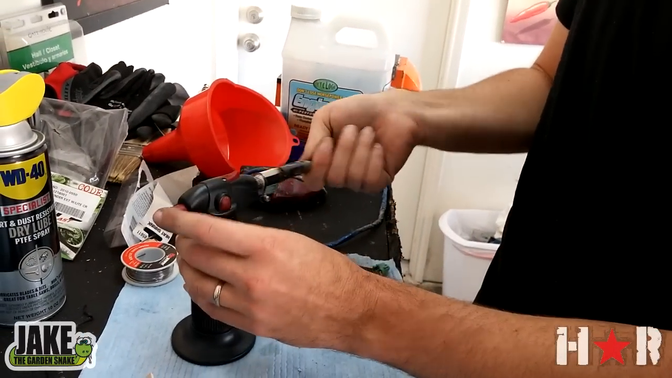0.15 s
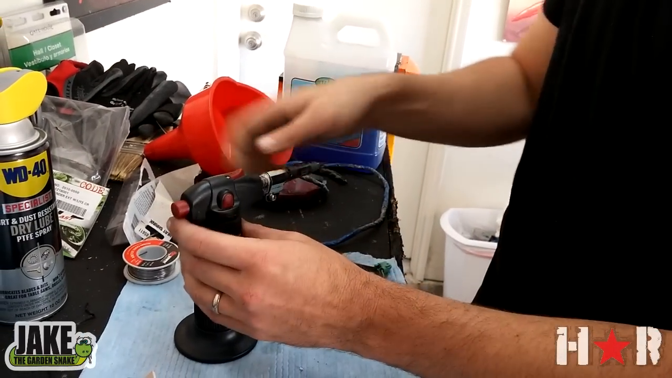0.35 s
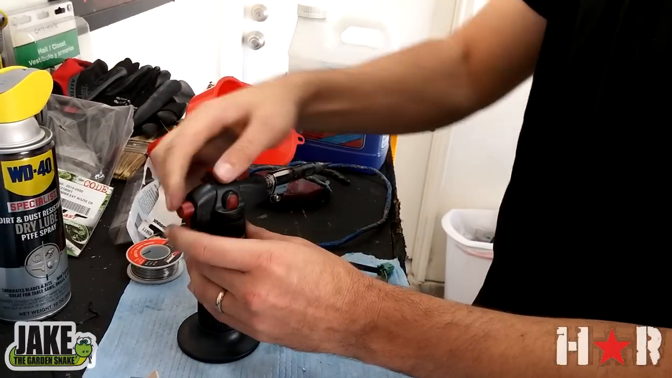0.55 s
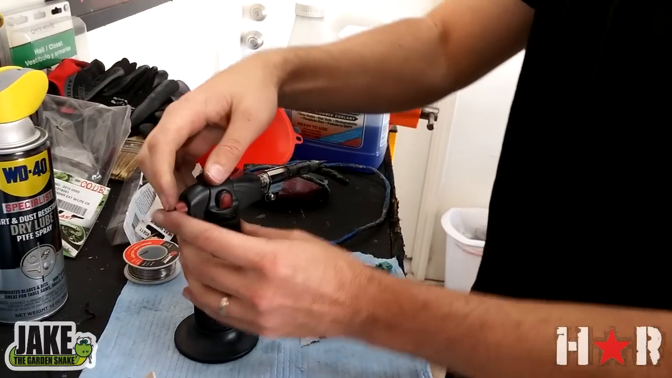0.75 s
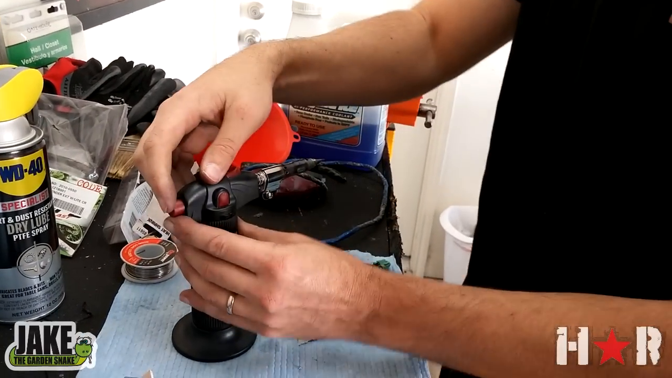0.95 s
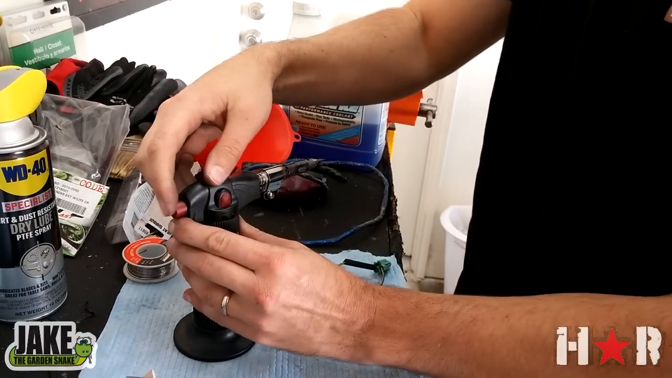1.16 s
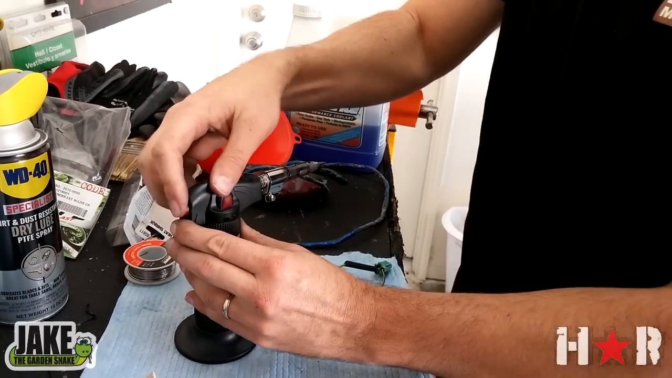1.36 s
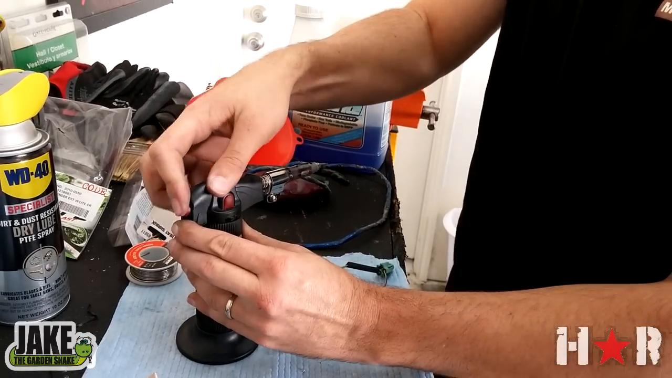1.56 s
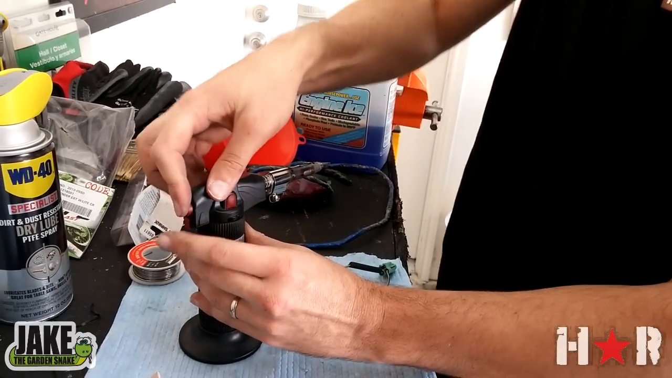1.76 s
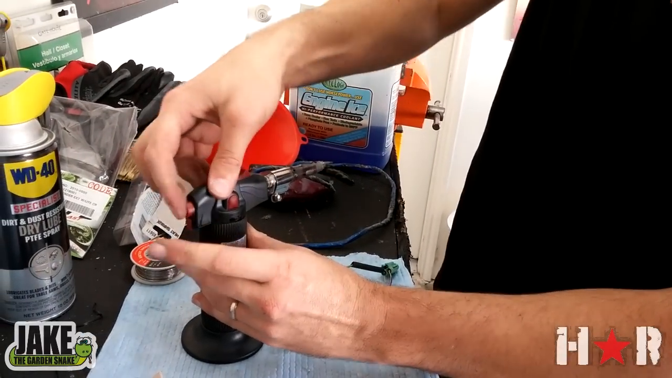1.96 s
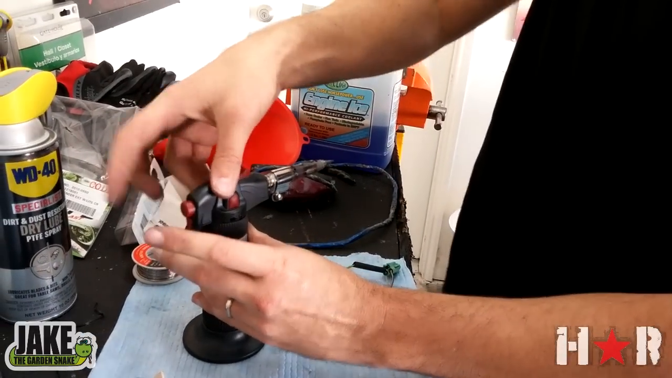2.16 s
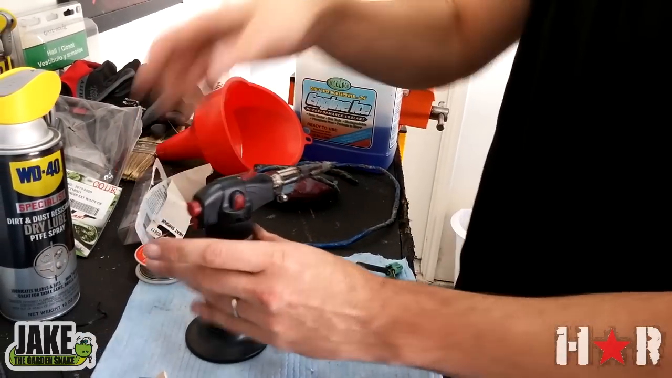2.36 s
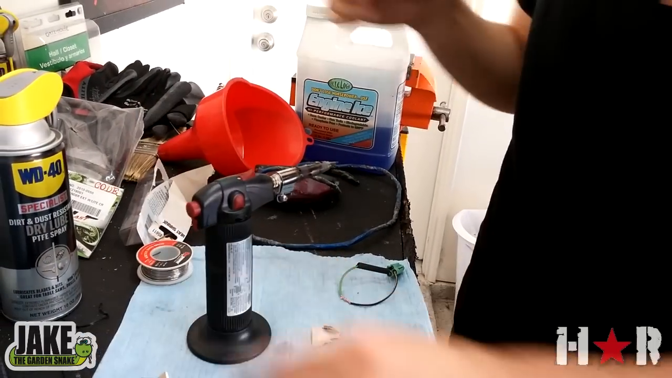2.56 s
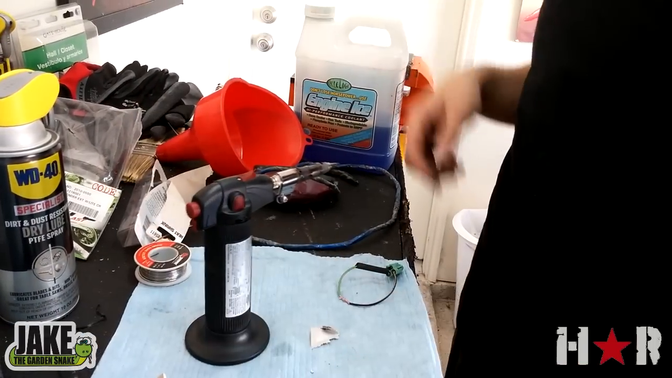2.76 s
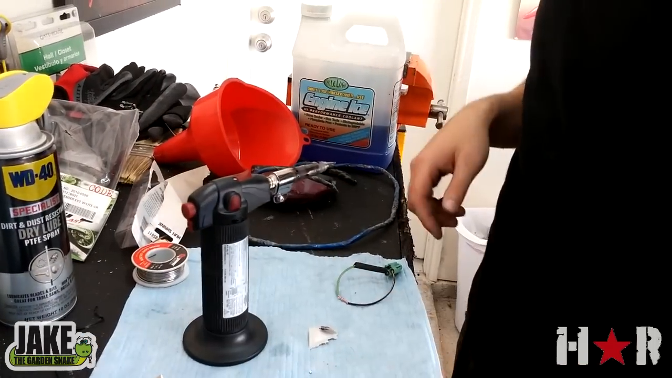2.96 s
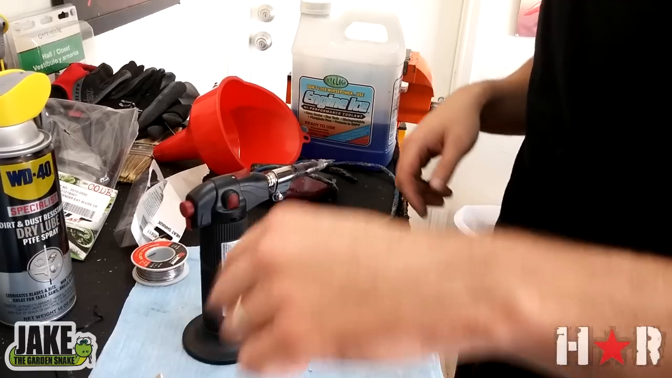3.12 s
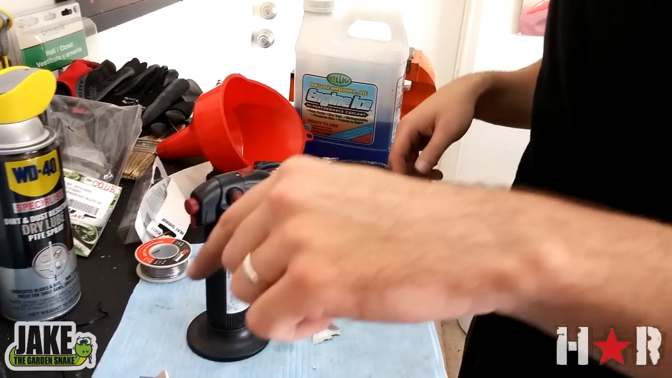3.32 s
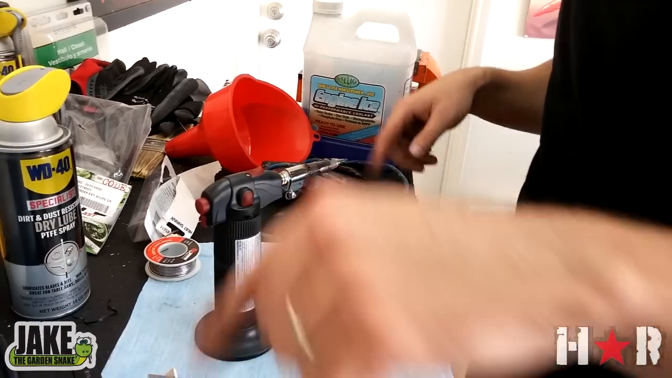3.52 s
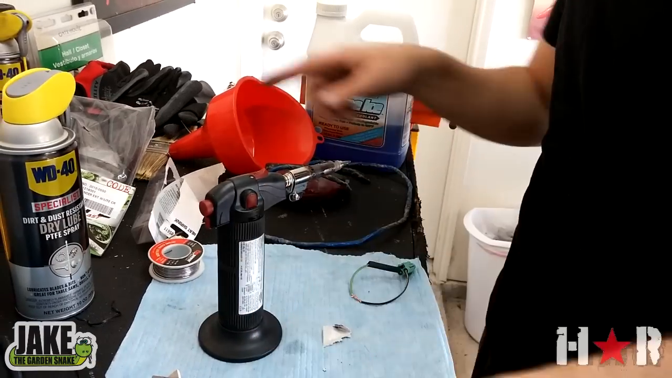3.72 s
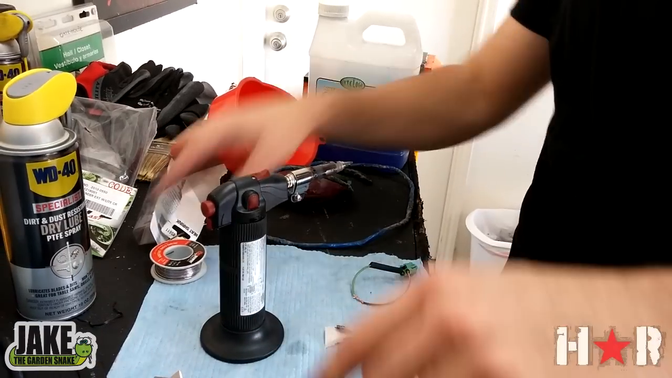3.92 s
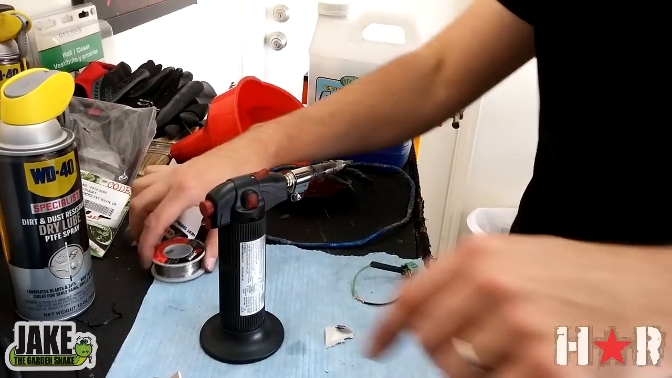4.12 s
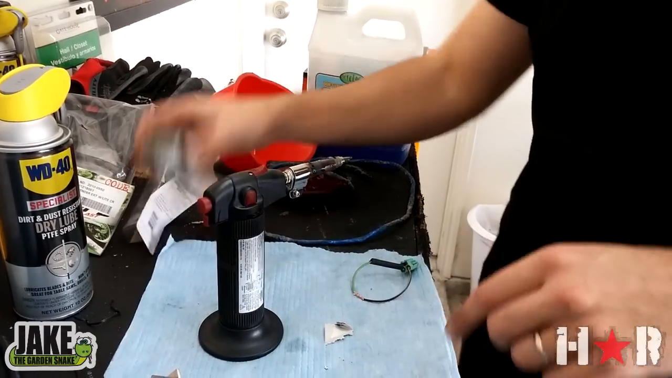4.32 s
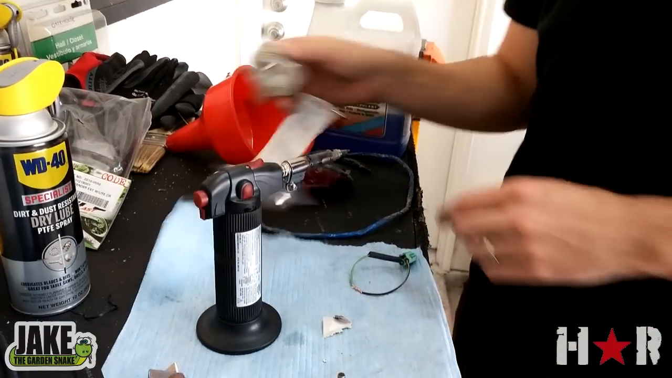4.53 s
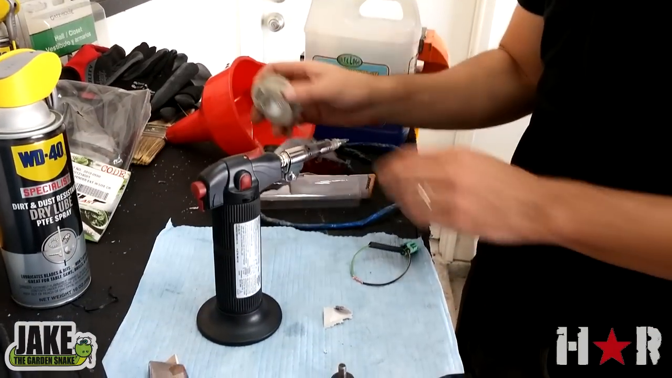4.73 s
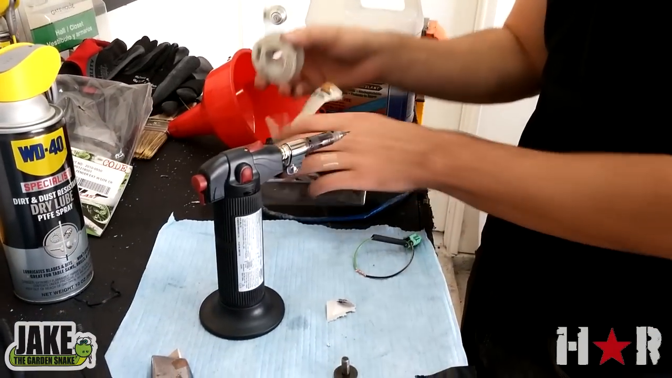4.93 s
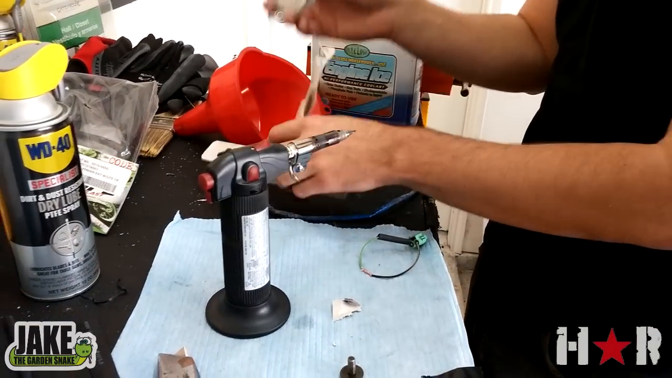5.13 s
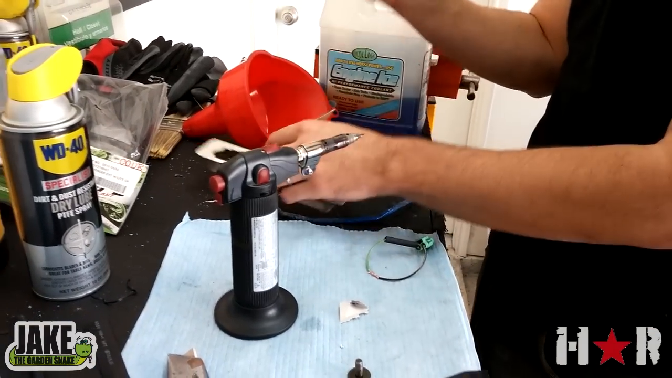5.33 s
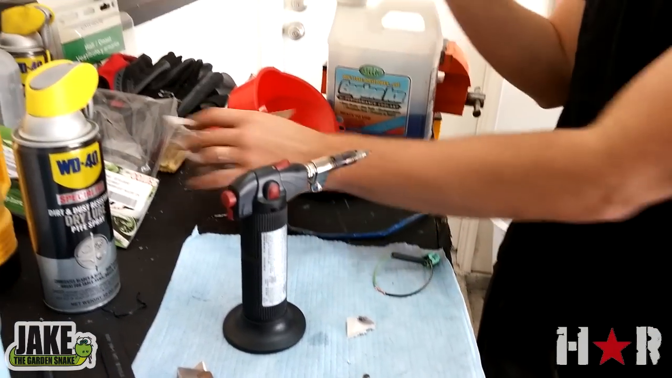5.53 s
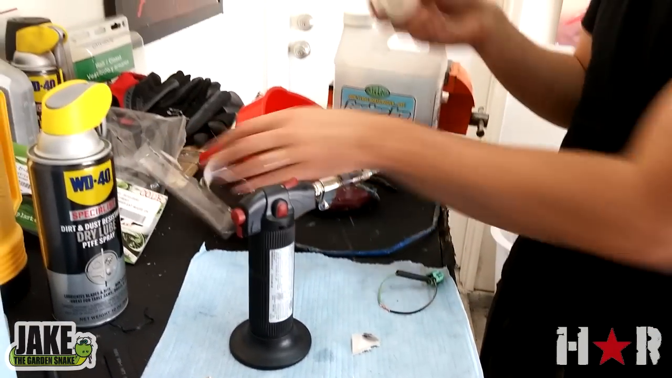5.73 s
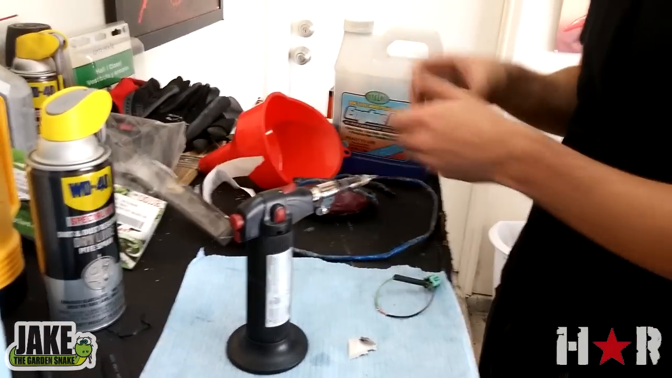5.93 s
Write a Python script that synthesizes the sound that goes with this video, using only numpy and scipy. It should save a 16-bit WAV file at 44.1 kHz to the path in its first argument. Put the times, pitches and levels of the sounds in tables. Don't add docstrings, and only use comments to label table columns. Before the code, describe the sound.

Close at a workbench in a small room, faint plastic clicks and finger rubs come over low hum. Gas briefly whistles, an igniter cracks loudly, and a flame catches with a dull thump. A strong, bright, fluttering hiss then holds to the end. Later a plastic spool is lifted off its box with light knocks, the box drops with a hard clack, rattles, and is pushed about.

```python
import sys
import numpy as np
from scipy import signal
from scipy.fft import rfft, irfft, next_fast_len
from scipy.io import wavfile
from scipy.ndimage import uniform_filter1d

SR = 44100
rng = np.random.default_rng(int(sys.argv[2]) if len(sys.argv) > 2 else 0)


def gain_from_db(level_db):
    decades = np.asarray(level_db, float) / 20
    return 10 ** decades


def wav_record(signal):
    frames = np.transpose(np.atleast_2d(signal))
    bounded = np.clip(frames, -1, 1)
    quanta = np.round(bounded * 32767).astype(np.int16)
    wavfile.write(sys.argv[1], SR, quanta)


N = 268172


def shaped(x, hz, db):
    n = next_fast_len(x.shape[-1], True)
    f = np.fft.rfftfreq(n, 1 / SR)
    gain = gain_from_db(np.interp(np.log(f + 1), np.log(hz), db))
    return irfft(rfft(x, n) * gain, n)[..., :x.shape[-1]]


def unit(x):
    return x / np.sqrt(np.mean(x ** 2))


def curve(s, v):
    return np.interp(np.arange(N) / SR, s, v)


def walk(rate):
    k = int(SR / rate)
    steps = np.repeat(rng.standard_normal(N // k + 1), k)
    return 1.75 * uniform_filter1d(uniform_filter1d(steps, k), k)[:N]


def swell(rows, rise_db_s, fall_db_s):
    t = np.arange(N) / SR
    power = 0
    for s, db, hold in rows:
        rise = rise_db_s * np.maximum(s - t, 0)
        fall = fall_db_s * np.maximum(t - s - hold, 0)
        power = power + gain_from_db(2 * (db - rise - fall))
    return np.sqrt(power)


def echoes(t60, wet_db, start, top_hz):
    t = np.arange(SR // 2) / SR
    mid, side = rng.standard_normal((2, len(t))) * (t > start) * gain_from_db(-60 * t / t60)
    side = signal.sosfilt(signal.butter(3, 800, "high", fs=SR, output="sos"), side)
    dull = signal.butter(1, top_hz, fs=SR, output="sos")
    tail = signal.sosfilt(dull, np.array([mid + side, mid - side]))
    return tail / np.sqrt(np.mean(np.sum(tail ** 2, axis=1))) * gain_from_db(wet_db)


def reflect(x, near_db, far_db):
    near = echoes(t60=0.047, wet_db=near_db, start=0.0018, top_hz=11550)
    far = echoes(t60=0.34, wet_db=far_db, start=0.00795, top_hz=9000)
    return signal.fftconvolve(x.mean(axis=0)[None], near + far, axes=1)[:, :N]


def ring(modes, push):
    t = np.arange(SR // 5) / SR
    body = 0
    for hz, db, t60 in modes:
        body = body + gain_from_db(db - 60 * t / max(t60, .002)) * np.sin(2 * np.pi * hz * t)
    y = signal.fftconvolve(body, push)[:len(t)]
    return y / np.abs(y).max()


def crack(colour, noise, decay_s, hz, bump_db):
    t = np.arange(len(noise)) / SR
    f = np.fft.rfftfreq(2 * len(t), 1 / SR)
    z = rfft(np.r_[0 * t[:88], noise * np.exp(-t / decay_s), 0 * t[88:]])
    even = np.sqrt(uniform_filter1d(np.abs(z) ** 2, size=len(t) // 40))
    bump = gain_from_db(bump_db * np.exp(-(np.log((f + 1) / hz) / 0.12) ** 2))
    burst = irfft(z / even * bump)
    y = shaped(burst, *np.transpose(colour))[66:len(t)]
    return y / np.abs(y).max()


def place(out, s, sound, db, pan_db, lag=2):
    for ch, i in enumerate((int(s * SR) + lag, int(s * SR))):
        out[ch, i:i + len(sound)] += (sound * gain_from_db(db + pan_db * (.5 - ch)))[:N - i]


def blows(table, pan_db, modes, body_db, push_s, t60, colour, crack_db, crack_s, top, top_db, top_s):
    out, t = np.zeros((2, N)), np.arange(SR // 20) / SR
    chance = rng.standard_normal((len(table), 3, len(t)))
    soft = signal.butter(2, (250, 2600), "band", fs=SR, output="sos")
    for (s, db, hz, bass_db, treble_db), (force, hiss, noise) in zip(table, chance):
        push = signal.sosfilt(soft, force * np.exp(-t / push_s))
        body = [(f * (1 + 0.035 * z), g + body_db, d) for (f, g, d), z in zip(modes, hiss)]
        low = [(370, bass_db + 11.5, 1.18 * t60), (240, bass_db + 10, 0.82 * t60), (540, bass_db + 7.5, t60)]
        place(out, s, ring([(hz, 0, t60)] + low + body, push), db, pan_db)
        place(out, s, crack(colour, noise, crack_s, hz, 7.6), db + crack_db, pan_db)
        place(out, s, crack(top, hiss, top_s, hz, 0), db + treble_db + top_db, 0, lag=1)
    return out


# (time [s], level [dB])
RECORDER_GAIN = [(0, -21.5), (.35, -20), (.55, -24), (.8, -19), (1.05, -17), (1.25, -8), (1.4, 7),
                 (1.6, -3), (6.08, -3.5)]
# (frequency [Hz], level [dB per Hz])
ROOM_COLOUR = [(18, -32), (35, -16), (60, -4.5), (78, -2), (100, -18), (140, -9.5), (250, -11.5),
               (360, -11.5), (650, -18.5), (2000, -27), (7000, -35.5), (9000, -31.5), (12000, -40),
               (15500, -36)]
# (frequency [Hz], level [dB])
FRIDGE_HUM = [(59.6, -60), (119.9, -50.5)]


def room():
    mid, side = shaped(rng.standard_normal((2, N)), *np.transpose(ROOM_COLOUR))
    side = shaped(side, [200, 900], [-20, 0])
    air = unit(mid + side * np.array([[1.1], [-.9]])) * gain_from_db(-48.5 + 1.2 * walk(3.235))
    t = np.arange(N) / SR
    hum = 0
    for hz, db in FRIDGE_HUM:
        hum = hum + np.sqrt(2) * gain_from_db(db + 1.2 * walk(6)) * np.sin(2 * np.pi * hz * t)
    hum = hum * gain_from_db(np.array([[1.2], [-1.2]]))
    low = shaped(air, [110, 170], [0, -40])
    gain_db = curve(*np.transpose(RECORDER_GAIN))
    bass_share = 0.8
    return (air - low) * gain_from_db(gain_db) + (low + hum) * gain_from_db(bass_share * gain_db)


# (time [s], peak level [dB], ring [Hz], bass [dB], treble [dB])
CATCH_TICKS = [
    (0.0199, -58.5, 2000, -22, 5.5),
    (0.2513, -66, 2020, -27, 8),
    (0.8738, -45, 1540, -13.5, 7),
    (1.066, -48, 2340, -41, -6),
    (1.085, -60, 576, -27, -30),
    (1.172, -62, 3000, -39, -19),
    (1.463, -30, 2510, -33, 0),
]
# (frequency [Hz], level [dB])
TICK_CRACK = [(800, -11.5), (1300, -2), (2500, -1), (3200, -21), (9000, -31)]
# (frequency [Hz], level [dB])
TICK_EDGE = [(2900, -23), (3600, -5), (4400, 4), (6200, -5), (8000, -13), (14000, -15)]


def catch_ticks():
    return blows(CATCH_TICKS, pan_db=5, modes=BOX_MODES[1:], body_db=-13.5, push_s=0.0022, t60=0.029,
                 colour=TICK_CRACK, crack_db=2.1, crack_s=0.0085, top=TICK_EDGE, top_db=2.2, top_s=0.0051)


# (time [s], hiss level [dB], cupping towards the upper note [dB], turn left minus right [dB])
HAND_MOVES = [(1.42, -1.5, 3.5, 2), (2.02, 0, 5, 0.5), (2.3, 0, 1, 0.5), (2.55, .5, -0.5, 2),
              (2.72, 1, 1, 0), (2.87, -2.5, 1, 3), (3.05, -1, -1.5, 2), (3.45, -1, 0.5, 0.5),
              (3.62, 1, 1, -3.5), (3.88, 0, 0, 2), (4.25, 0.5, 0, -0.5), (4.6, 0.5, 0, -1),
              (4.85, 1, 0.5, 2.5), (5.25, 0, 0, -1.5), (5.55, 1.5, -0.5, 0), (5.8, 0.5, -2, 0.5),
              (6.08, 0, 0.5, -2)]


def hands():
    s, *columns = np.transpose(HAND_MOVES)
    return [curve(s, column) for column in columns]


# (frequency [Hz], left level [dB per Hz], right level [dB per Hz])
JET_COLOUR = [(423, 3, -31), (700, -68, -54), (854, 7, 6.5), (1120, -4, -30.5), (1486, -11.5, 1.5),
              (2000, 2.5, -16.5), (2500, 3.5, -3), (3100, 1.5, 0), (3490, -5.5, -9), (3840, -12.5, -6),
              (4584, 3, 1), (4790, -2, -2.5), (5930, -3.5, -8.5), (6660, -12, -5), (7610, -17.5, -26),
              (7920, -29, -31.5)]
PART_EDGES = (1583, 2280, 3740, 5160)
# (burning [dB], unlit [dB], share of cupping, share of turn, opening [dB per s])
JET_PARTS = [
    (-59, -80, 0.38, 0, 400),
    (-45.5, -70, -0.045, 0.64, 600),
    (-41, -72, -0.75, 0.11, 600),
    (-39, -54, 0.63, 1, 1500),
    (-42.5, -60, .3, .4, 500),
]
# (time [s], level [dB], length [s])
FINGER_SLIDES = [
    (.02, -76, 0),
    (.26, -72.5, 0.046),
    (.4, -82, 0.11),
]
FINGER_COLOUR = (-17, 0, -6, -1.5, -6)
# (frequency [Hz], level [dB])
COLD_GAS_COLOUR = [(2900, 0), (3300, -14), (3800, 3), (4300, 5), (5000, -7), (5800, 3), (6400, -3),
                   (7000, -20)]
CATCH_S = 1.36


def jet():
    gas = rng.standard_normal(N) * gain_from_db(0.94 * walk(300))
    heard = np.array([np.roll(gas, 2), gas])
    for _ in range(3):
        path = echoes(t60=.2, wet_db=-8, start=.002, top_hz=9000)
        heard = heard + signal.fftconvolve(gas[None], path, axes=1)[:, :N] * gain_from_db(5.1 * walk(1.228))
    hz, left, right = np.transpose(JET_COLOUR)
    heard = np.array([shaped(heard[0], hz, left), shaped(heard[1], hz, right)])

    n = next_fast_len(N, True)
    spectrum, f = rfft(heard, n), np.fft.rfftfreq(n, 1 / SR)
    below = [1 / (1 + np.exp(np.minimum((f - edge) / 150, 50))) for edge in PART_EDGES]
    below = [0 * f] + below + [0 * f + 1]
    level_db, cup_db, turn_db = hands()
    lit = swell([(CATCH_S, 0, N / SR)], 219, 0) * (np.arange(N) > IGNITER_SNAPS[0][0] * SR)
    slides = swell(FINGER_SLIDES, 900, 70)
    burning, cold = 0, 0
    for k, (lit_db, unlit_db, cup, turn, open_db_s) in enumerate(JET_PARTS):
        band = irfft(spectrum * (below[k + 1] - below[k]), n)[:, :N]
        band = band / np.sqrt(uniform_filter1d(np.mean(band ** 2, axis=0), size=SR // 4))
        gain = lit * gain_from_db(lit_db + level_db + cup * cup_db) + slides * gain_from_db(FINGER_COLOUR[k])
        cold = cold + band * swell([(1.158, unlit_db, .11)], open_db_s, 300)
        burning = burning + band * gain * gain_from_db(1.16 * walk(9) + turn * np.array([turn_db, -turn_db]) / 2)
    return burning + shaped(cold, *np.transpose(COLD_GAS_COLOUR))


# (time [s], level [dB], length [s])
HANDLING = [
    (.25, -91, .35),
    (1.17, -67, 0.055),
    (3.85, -46, .15),
    (4.25, -40.5, 0.038),
    (4.42, -34.5, 0.013),
    (4.5, -54, 0.14),
    (4.62, -46.5, 0.14),
    (4.82, -43, 0.051),
    (5.43, -45, 0.13),
]


def rustle():
    grains = rng.standard_normal((2, N)) * gain_from_db(2.8 * walk(150) * (np.arange(N) > 1.3 * SR))
    grains[1] = .7 * grains[0] + .7 * shaped(grains[1], [300, 900], [-18, 0])
    colour = shaped(grains, [150, 350, 900, 1700, 2600, 5000, 12000], [-40, 2, -4.0, -6.5, -4, -12, -30])
    return unit(colour) * swell(HANDLING, 200, 73) * gain_from_db(2.0 + np.array([[1.5], [-1.5]]))


# (time [s], level [dB])
IGNITER_SNAPS = [
    (1.2676, -2.5),
    (1.2690, 0),
    (1.2717, 3),
    (1.2776, -26),
    (1.282, -29.5),
]
# (frequency [Hz], level [dB])
SNAP_CRACK = [(500, -19), (1800, -11.5), (2900, -3), (4500, -7.5), (6000, -7), (7200, -17), (8800, -6.5),
              (10200, -9.5), (12000, -9), (13700, -10.5), (15500, -8)]


def ignition():
    out = np.zeros((2, N))
    for (s, db), noise in zip(IGNITER_SNAPS, rng.standard_normal((len(IGNITER_SNAPS), 1024))):
        place(out, s - .0005, crack(SNAP_CRACK, noise, 0.00197, 3000, 0.36), db, .3, lag=1)
    return out


# (time [s], level [dB], modes as (frequency [Hz], level [dB], t60 [s]))
LOW_THUMPS = [
    (1.2728, -5.5, [(65, -44, 0.087), (176, 11.5, 0.077), (249, -3.5, 0.29), (313, 9, 0.069)]),
    (3.832, -28.5, [(59.6, -10, 0.21), (105, -3, 0.13), (184, -10, .1)]),
    (3.4, -39.5, [(237, 1, 0.32), (300, -12, .1)]),
    (4.417, -26.5, [(199, -2, .12), (403, 1, .1)]),
]


def thumps():
    out = np.zeros((2, N))
    for s, db, modes in LOW_THUMPS:
        place(out, s, -ring(modes, np.hanning(40)), db, .8)
    return out


def roar():
    noise = rng.standard_normal((2, N))
    mid, side = shaped(noise, [110, 157, 248, 339, 560, 710], [-15, -26, -7.5, 6.0, -7.5, -26.5])
    burst = swell([(1.3, -39, 0)], 2000, 180)
    steady = swell([(CATCH_S, -54, N / SR)], 590, 0) * gain_from_db(0.2 * hands()[0])
    return unit(mid + 0.05 * side * np.array([[1], [-1]])) * (burst + steady) * gain_from_db(2.5 * walk(11))


# (time [s], peak level [dB], ring [Hz], bass [dB])
SPOOL_LIFT = [(3.837, -24.5, 2530, -36), (3.851, -25.5, 1580, -14), (3.875, -28, 1080, -16),
              (3.9, -30, 910, -18), (4.208, -30, 1500, -27), (4.221, -19, 1010, -24),
              (4.243, -17, 995, -28), (4.258, -19.5, 1574, -37), (4.282, -21, 904, -19),
              (4.31, -26, 1510, -36), (4.366, -26.5, 1469, -26), (4.379, -23, 2170, -29),
              (4.393, -13.5, 1750, -19)]
# (time [s], peak level [dB], ring [Hz], bass [dB], treble [dB])
BOX_KNOCKS = [(4.416, -2, 1820, -18.5, -21), (4.425, -11, 1750, -18, -38), (4.459, -22.5, 1130, -7, -36),
              (4.488, -22, 1680, -18, -36), (4.501, -23, 1730, -30, -33), (4.516, -26, 1750, -6, -33),
              (4.53, -21, 1630, -24, -41), (4.621, -26, 1520, -33, -45.5), (4.806, -29, 1710, -17, -31.5),
              (4.832, -26, 880, -7, -32), (4.87, -35, 1140, -24, -26), (5.038, -31.5, 1700, -31, -16.5),
              (5.424, -12, 865, -17, -36), (5.433, -15.5, 560, -22, -37), (5.438, -18.5, 1750, -10, -41),
              (5.47, -24, 910, -16, -42), (5.627, -35.5, 2500, -5, -26), (5.669, -32, 1580, -7, -30)]
# (frequency [Hz], level [dB], t60 [s])
BOX_MODES = [(864, -1.5, 0.015), (1578, -5, 0.11), (1750, -42, 0.12), (2558, 4, 0.033), (3123, 4, 0.025)]
# (frequency [Hz], level [dB])
KNOCK_CRACK = [(150, -41), (250, -9), (400, 3), (600, -7), (900, 1.5), (1700, 4.5), (3000, -9), (4000, -6),
               (8700, -49), (14000, -31)]
# (frequency [Hz], level [dB])
KNOCK_EDGE = [(3500, -20), (6000, -3.5), (8700, 4), (11000, -3.5), (15000, -13)]


def plastic_knocks():
    hits = [row + (-48,) for row in SPOOL_LIFT] + BOX_KNOCKS
    return blows(hits, pan_db=2, modes=BOX_MODES, body_db=-5.5, push_s=0.0015, t60=0.041,
                 colour=KNOCK_CRACK, crack_db=-2.14, crack_s=0.0068, top=KNOCK_EDGE, top_db=8.8, top_s=0.0025)


# (frequency [Hz], left minus right [dB])
PORT_BALANCE = [(250, -1), (700, -2.5), (2000, 8), (4500, 0.5), (8200, -9), (11000, -0.5), (14500, 12.5)]


def scene():
    ticks, snap, lows, knocks = catch_ticks(), ignition(), thumps(), plastic_knocks()
    wet = reflect(snap, -11, -11) + reflect(ticks, -20, -6.5)
    wet = wet + reflect(knocks, -5.5, -8.0) + reflect(lows, -22.0, -12)
    diffuse = snap + wet + room() + rustle()
    hz, pan_db = np.transpose(PORT_BALANCE)
    diffuse = np.array([shaped(diffuse[0], hz, pan_db / 2), shaped(diffuse[1], hz, -pan_db / 2)])
    return ticks + knocks + lows + diffuse + jet() + roar()


# (frequency [Hz], level [dB])
KEEP_LEVEL = [(6600, -30), (7000, -2), (7500, .4), (8600, .4), (9400, -.2), (10000, .4), (13000, .5),
              (14000, -.3), (16000, -.2)]


def thin_treble(x):
    f, _, z = signal.stft(x, SR, window="cosine", nperseg=2048, noverlap=1024)
    power = np.abs(z[:, :1024]) ** 2 + 1e-18
    bands = power.reshape(2, 256, 4, -1).sum(axis=(0, 2))
    bands_db = 10 * np.log10(uniform_filter1d(bands, size=3, axis=1))
    dip_db = bands_db - uniform_filter1d(np.median(bands_db, axis=1), size=7)[:, None]
    all_db = uniform_filter1d(dip_db, size=41, axis=0)
    needed_db = np.interp(f[2:1024:4], *np.transpose(KEEP_LEVEL), left=-99)[:, None]
    keep = uniform_filter1d(dip_db, size=2, axis=0) - .9 * all_db > needed_db
    frame = power[:, 8:].sum(axis=(0, 1))
    quiet = frame < .02 * np.median(frame)
    z[:, :1024] *= np.repeat(keep | (all_db > 6) | quiet, 4, axis=0)
    return signal.istft(z, SR, window="cosine", nperseg=2048, noverlap=1024)[1][:, :N]


def top_cut(x):
    return signal.sosfilt(signal.butter(12, 16980, fs=SR, output="sos"), x)


def record(dry):
    dry = signal.sosfilt(signal.butter(4, 50, "high", fs=SR, output="sos"), dry)
    soft = shaped(.9 * np.tanh(dry / .9), [15720, 15900], [0, -60])
    mix = thin_treble(soft) - .0012
    return top_cut(mix)


dry = scene()
out = record(dry)
wav_record(out)
```